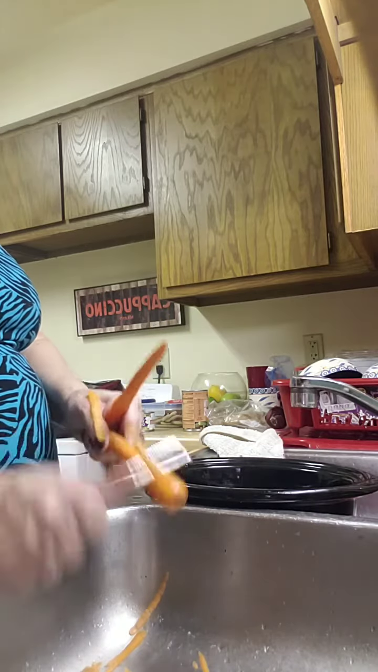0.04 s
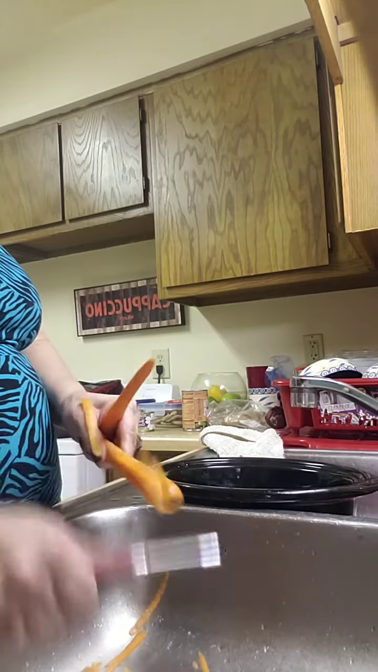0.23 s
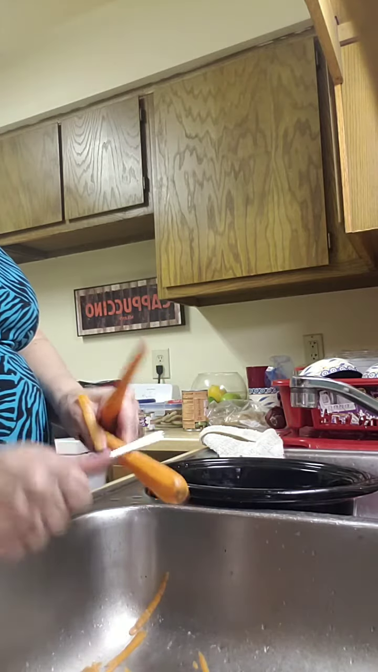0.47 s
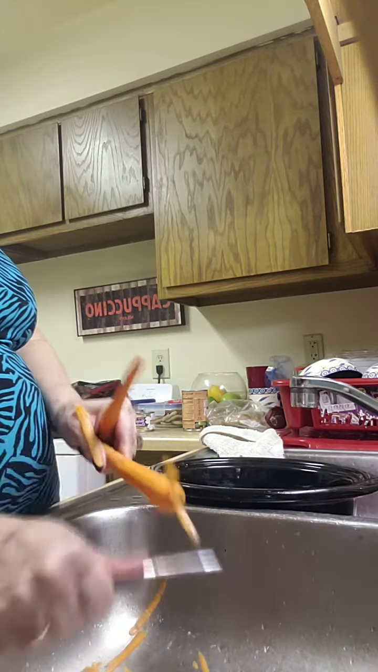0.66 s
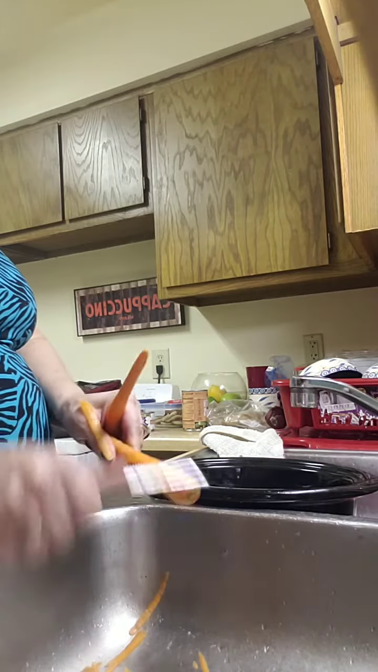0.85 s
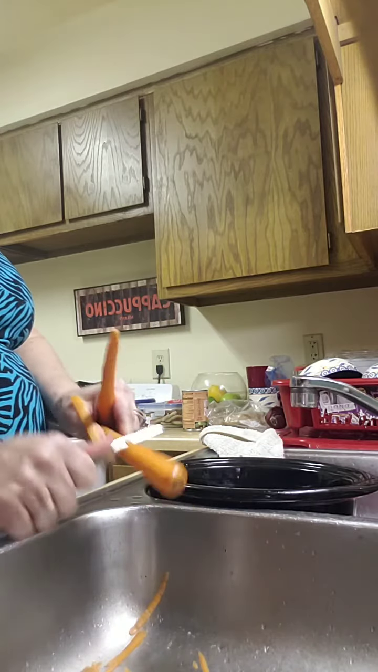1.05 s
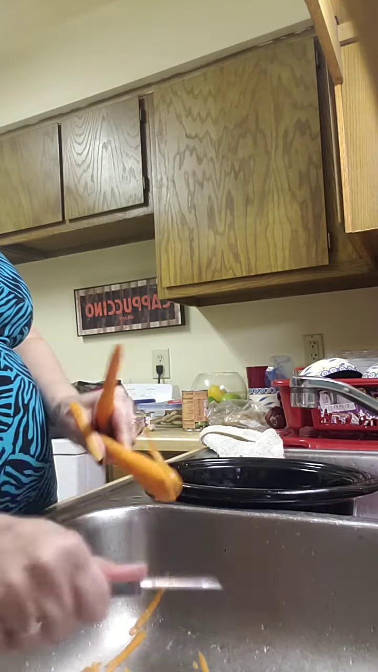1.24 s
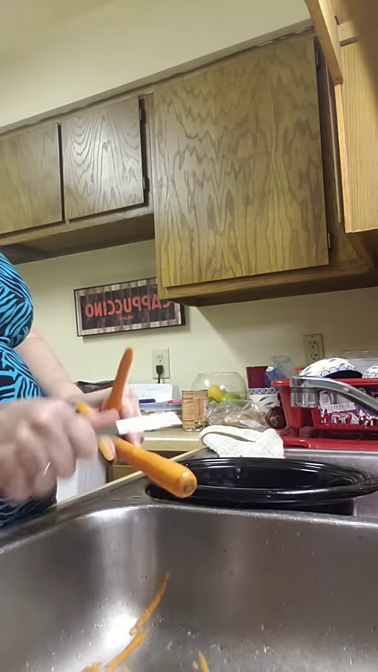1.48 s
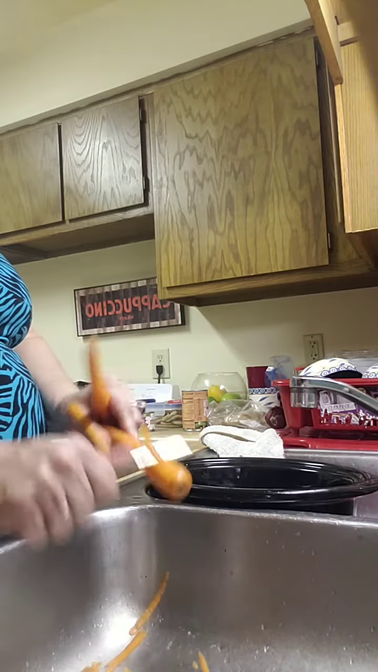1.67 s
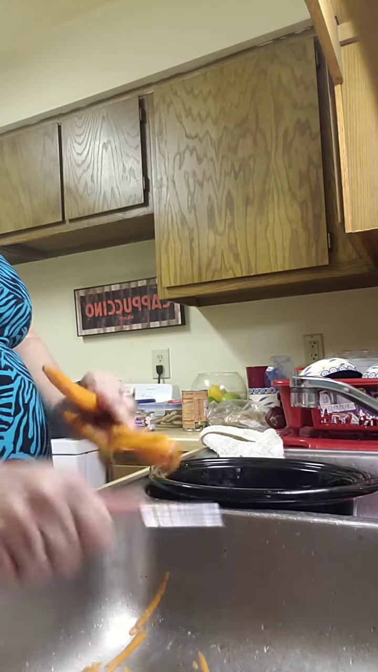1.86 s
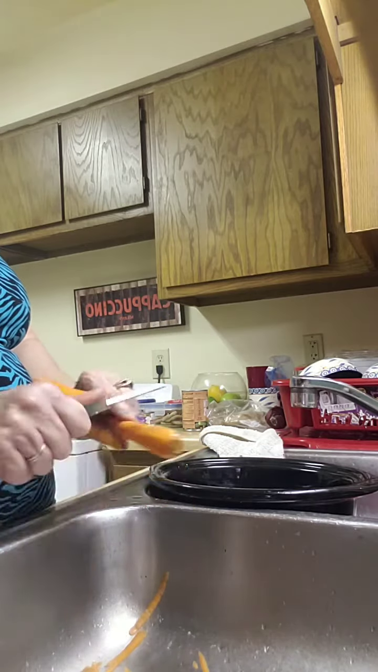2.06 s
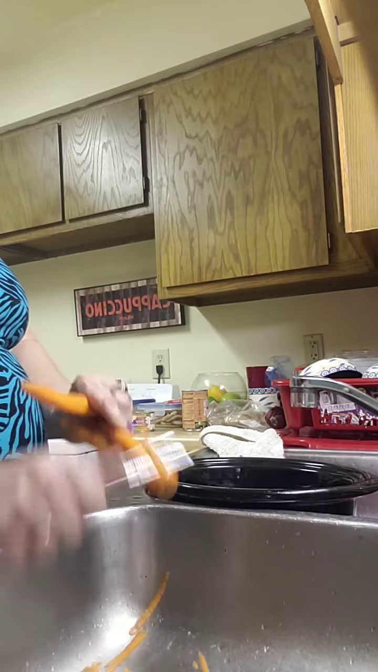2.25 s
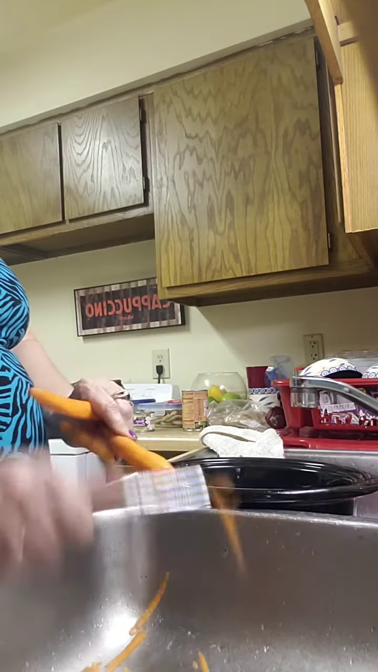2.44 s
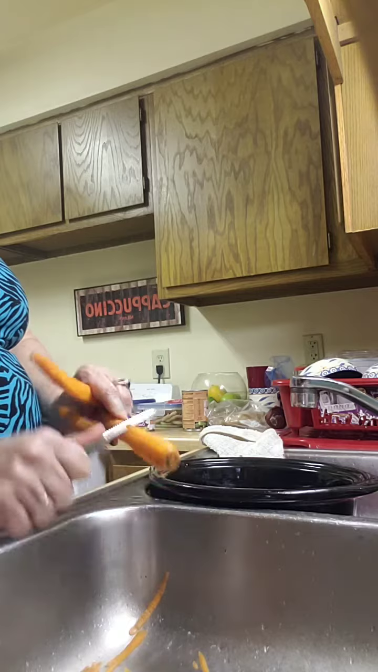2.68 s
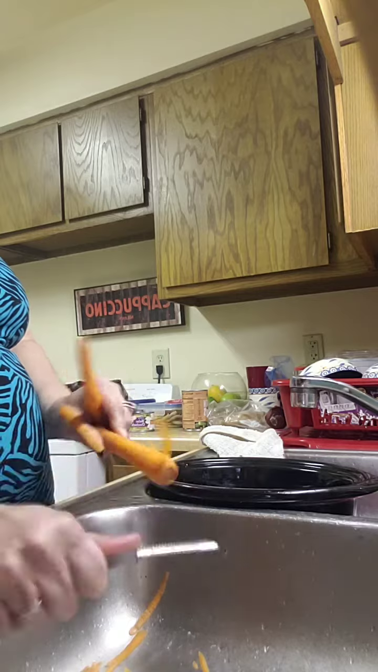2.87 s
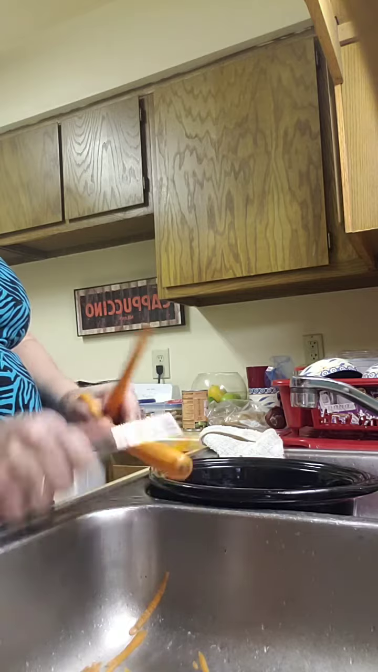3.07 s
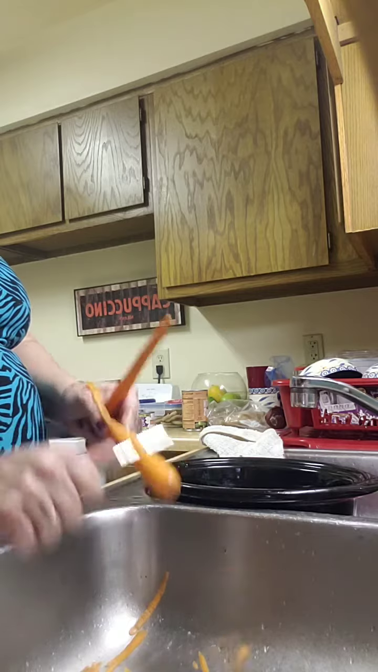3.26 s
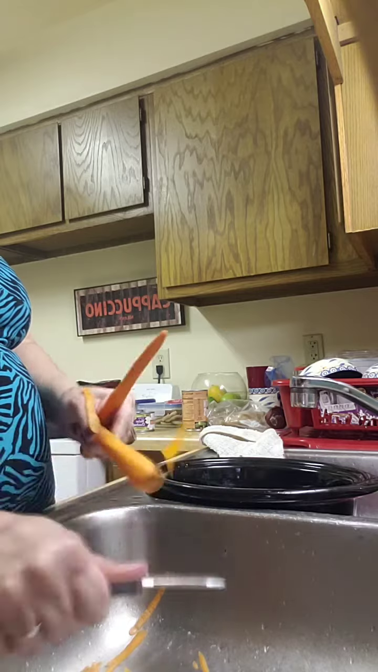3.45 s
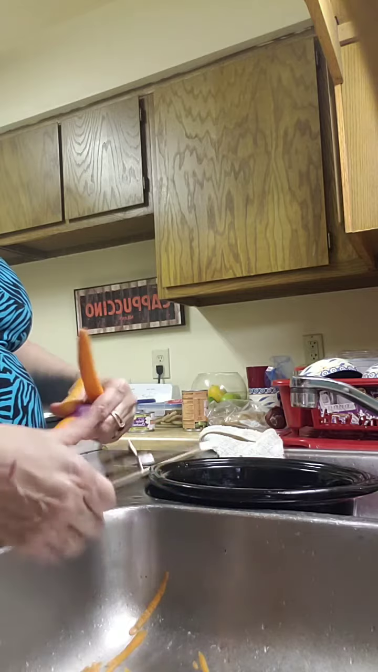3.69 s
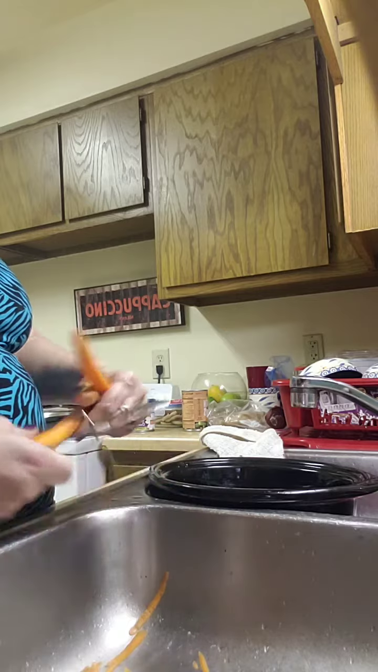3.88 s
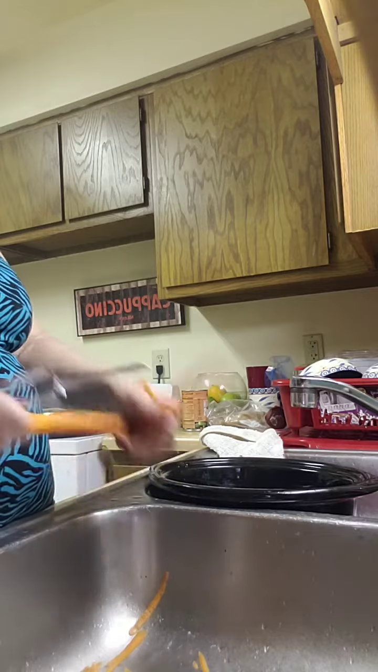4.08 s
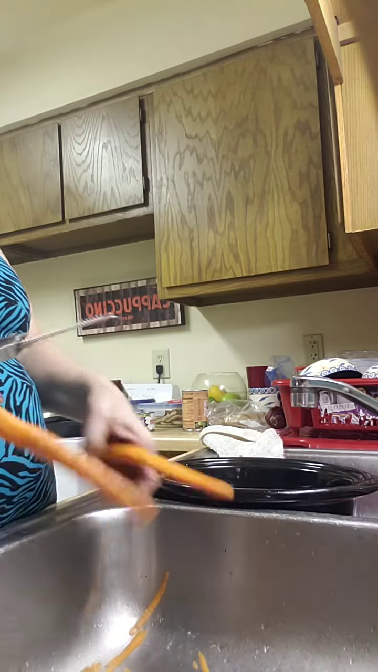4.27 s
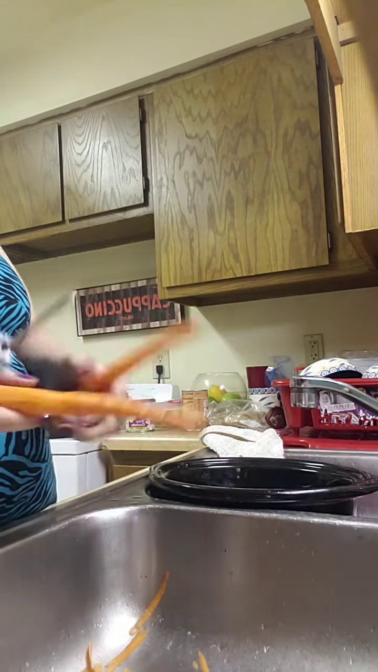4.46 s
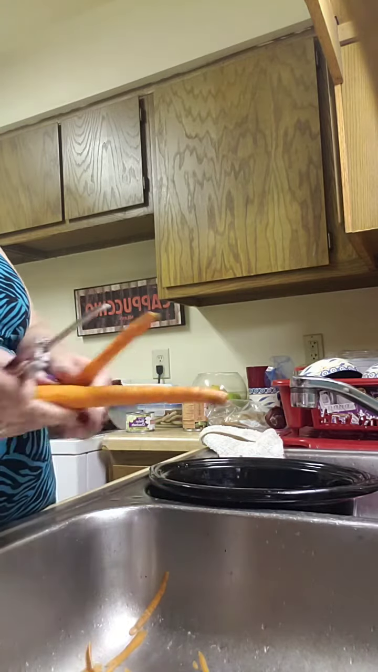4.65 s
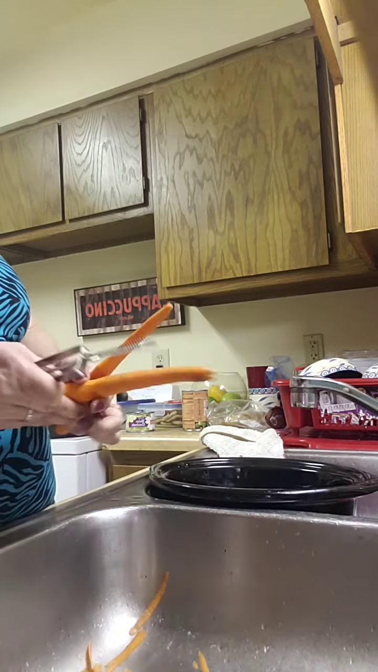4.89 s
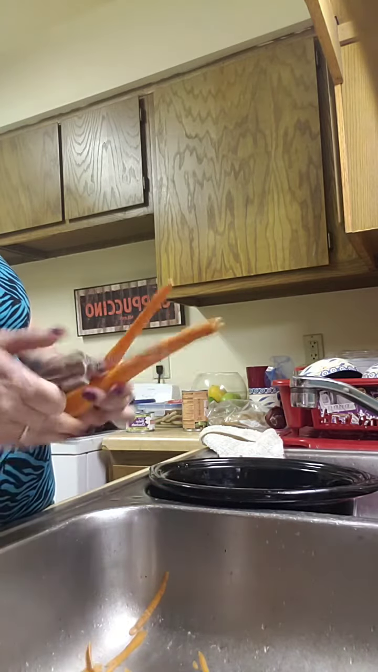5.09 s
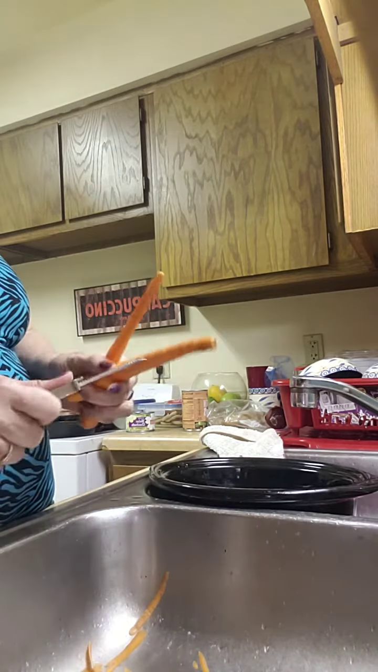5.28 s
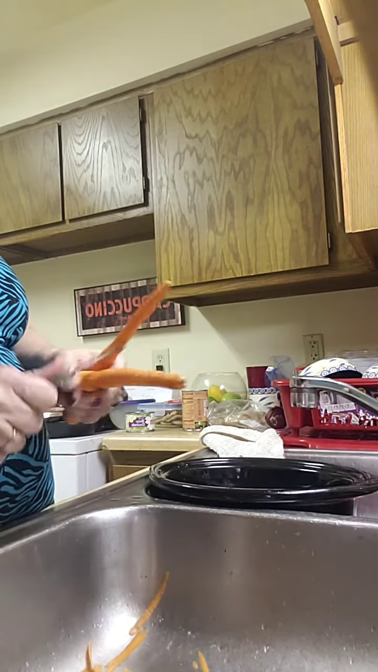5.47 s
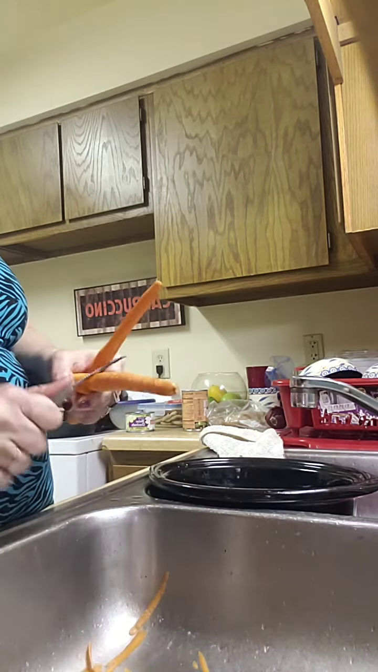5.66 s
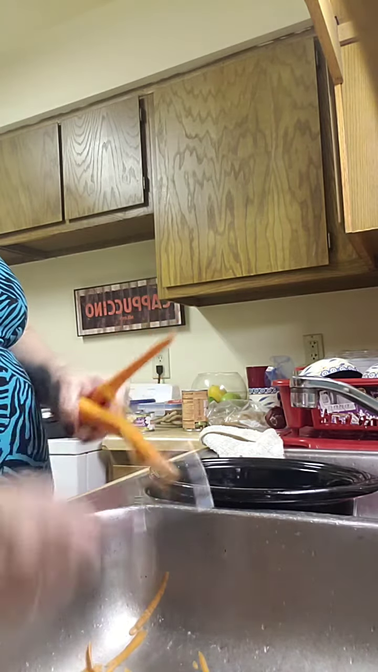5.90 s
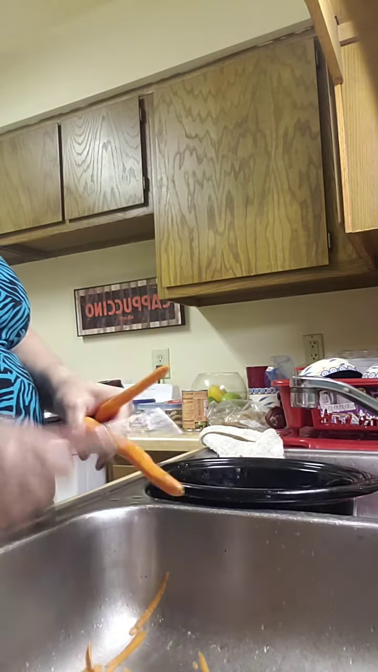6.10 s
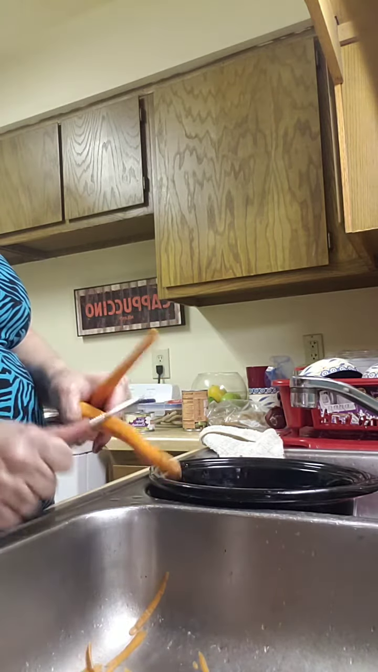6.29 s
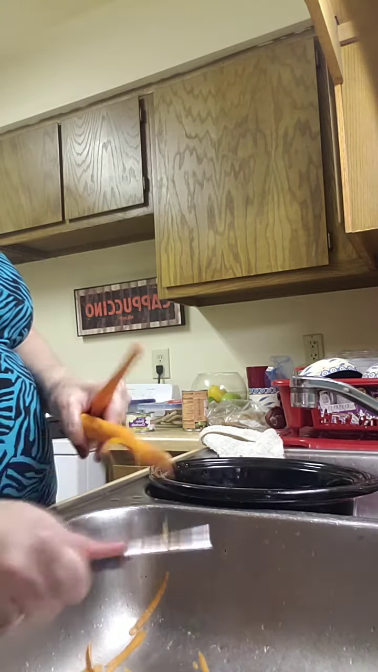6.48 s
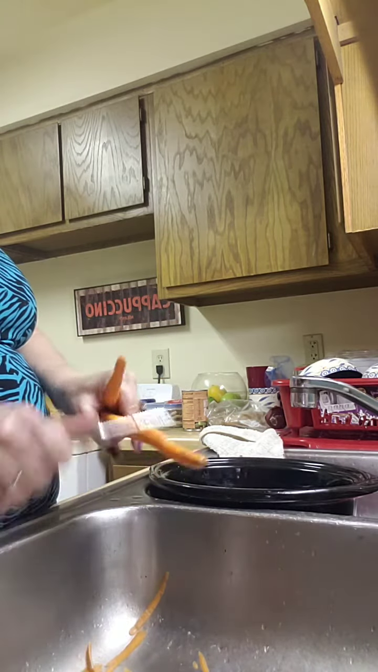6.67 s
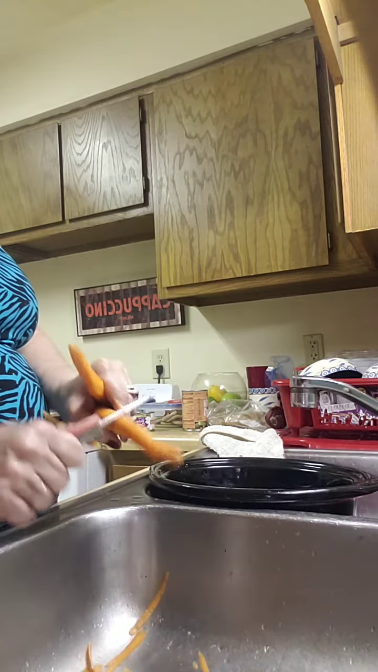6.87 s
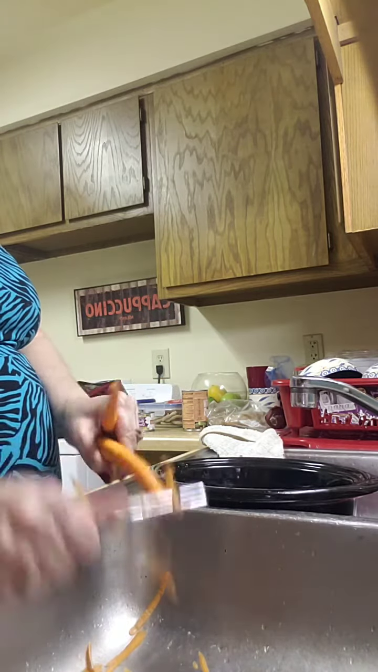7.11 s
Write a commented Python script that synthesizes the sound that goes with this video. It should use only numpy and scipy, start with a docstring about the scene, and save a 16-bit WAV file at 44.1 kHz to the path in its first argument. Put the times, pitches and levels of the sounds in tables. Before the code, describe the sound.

Carrots being peeled over a metal basin: short crisp scrapes, loose-blade rattles, a few wet plinks and knocks, quiet low hum behind.

```python
"""Raw carrots are scraped with a steel hand peeler over a steel sink in a small kitchen, 7.14 s.
From the start a refrigerator hums (wavering sines over shaped noise) and the edge hisses along
the carrot in strokes (spiky shaped noise). Then carrots knock in the hand (decaying tones, noise),
the loose blade clicks (chattering noise, steel modes; faint hiss trails two groups) and peels drop
into the basin (struck plate modes, slap noise). The work excites a short room tail."""
import sys
import numpy as np
from scipy import signal
from scipy.fft import rfft, irfft
from scipy.io import wavfile
from scipy.ndimage import uniform_filter1d

SR = 44100
rng = np.random.default_rng(int(sys.argv[2]) if len(sys.argv) > 2 else 0)


def transcribe(u):
    """Save the signal u as a 16-bit wav file named by the first command-line argument.

    u: samples, shape (n,) or (channels, n), limited to [-1, 1]; the rate is SR.
    q: integer samples, one column per channel.
    """
    v = np.clip(np.atleast_2d(u).T, -1, 1)
    q = np.round(v * 32767).astype(np.int16)
    wavfile.write(sys.argv[1], SR, q)


N = 314874

# refrigerator tones: pitch_hz; mean rms level_db
HUM_PITCH_HZ = [59.15, 118.4, 217.9, 240, 405.5, 437, 478]
HUM_LEVEL_DB = [-56.5, -64.5, -53, -52, -67.5, -67.5, -61]
# room noise spectrum: freq_hz, density_db (per Hz)
ROOM_NOISE = [(30, -17), (45, -37), (75, -19), (110, -6), (170, -11.5), (230, -2.5), (320, -13.5),
              (440, -7.5), (560, -13), (760, -17.5), (1150, -22.5), (1700, -25.5), (2600, -32),
              (13900, -38.5)]
ROOM_NOISE_DB = -54.5  # rms
# scrapes: peeling strokes; the faint rows at 3.615 and 5.28 are hiss trailing off after blade clicks
# start_s, build_s, pull_s, lift_s, land_db, full_db, end_db, bite_db (re level)
SCRAPES = [(0.0, 0.092, 0.015, 0.052, -39.5, -35.5, -35.5, -12.5),
           (0.49, 0.094, 0.076, 0.011, -45, -36.5, -41.5, -13.5),
           (1.035, 0.093, 0.089, .022, -51, -36, -42.5, -16),
           (1.595, 0.047, 0.13, 0.013, -50, -38, -37.5, -16.5),
           (2.17, 0.065, 0.085, .014, -62, -37, -36, -14.5),
           (2.69, 0.063, 0.082, 0.031, -48, -35.5, -36.5, -15.5),
           (3.23, .064, 0.079, 0.018, -45.5, -31.5, -34.5, -17.5),
           (3.615, .005, 0.14, .02, -55, -59, -71, -20), (5.28, .005, .046, .03, -50, -54, -59, -26),
           (5.675, 0.027, 0.073, .02, -47, -45, -44.5, -10.5),
           (5.775, 0.022, 0.11, .034, -48, -36, -39.5, -14),
           (6.275, 0.042, .006, .03, -47, -42.5, -41.5, -11.5),
           (6.337, .035, 0.082, .047, -42, -33.5, -42.5, -19),
           (6.904, 0.043, 0.056, 0.035, -46.5, -35.5, -37, -17),
           (7.012, 0.045, 0.038, 0.064, -43, -37.5, -41.5, -20.5)]
# scrape hiss spectrum: freq_hz, density_db (per Hz)
SCRAPE_SPECTRUM = [(1470, -54), (2500, -53), (3190, -22.5), (3870, -15), (4770, -10.5), (5350, -7),
                   (6310, 0), (8290, -11), (9370, -3.5), (10400, -5), (11000, -2), (12200, 2.5),
                   (13900, -6.5)]
# low part of the scrape, spectrum: freq_hz, density_db (per Hz)
BITE_SPECTRUM = [(530, -9), (900, -12), (1520, -11), (1680, -1), (1830, -6.5), (2150, -5), (2960, -3),
                 (3600, -9.5), (4680, 1), (7920, -120)]
# peeler blade modes: freq_hz, level_db, t60_s
BLADE_MODES = [(4200, 23.5, 0.047), (4600, 16, 0.076), (5400, 35.5, 0.0063), (6030, 25.5, 0.0076),
               (6690, -51, 0.023), (7100, -27, .03), (7730, -11, 0.076), (9500, -8.5, 0.085),
               (9800, 14, 0.016), (10100, -13, 0.027), (11280, 27, 0.067), (12100, -23, 0.026),
               (12140, -39, .03), (13400, 20, 0.033), (14300, 2, .03)]
# hands shifting on wet carrots: time_s, level_db
RUSTLE = [(0, -70), (.3, -74), (.72, -76), (.946, -73), (1.4, -71.5), (1.98, -68.5), (2.55, -73),
          (2.97, -67), (3.2, -79), (3.5, -70), (3.81, -85), (4.014, -65.5), (4.47, -66), (4.67, -63),
          (4.86, -71), (5.08, -68), (5.49, -63), (5.65, -73), (6.0, -88), (6.186, -61.5), (6.6, -74),
          (6.85, -66), (7.14, -59)]
# carrots knocking together: start_s, level_db, pitch_hz, t60_s, snap_db (re level), thud_db (re level)
KNOCKS = [(0.174, -41, 1282, 0.11, -18, -12), (4.3504, -29, 1197, 0.05, -12.5, -8),
          (4.3635, -37, 1180, 0.16, -3.5, -21), (5.0392, -35, 1607, 0.33, -14, -22)]
# blade clicks: start_s, level_db, treble_db (relative), frame_hz, frame_db (relative), blade_hz, rattle_ms
CLICKS = [(0.303, -44, -24, 3240, -13, 4940, 9.3), (0.398, -39.5, -13, 2300, -18, 4300, 11),
          (0.4747, -29.5, -6, 2070, -10, 4520, 12.5), (0.652, -29, -12, 2030, -16, 4370, 5.1),
          (0.7502, -42, -3, 1970, -14, 7000, 11.5), (0.979, -50.5, 5.5, 2400, -1, 6460, 17),
          (1.0154, -19, -6, 1990, -22, 6450, 6.1), (1.2027, -23, -3, 2050, -16.5, 4600, 11),
          (1.3242, -53, -13, 1950, 1.5, 4610, 13), (1.492, -47.5, 2, 2180, -14, 6500, 11),
          (1.5814, -30.5, -6.5, 1940, -15.5, 4840, 8.1), (1.766, -25, -22, 3230, -15, 5060, 3.6),
          (1.8674, -51, -16, 2830, 0.5, 6380, 10), (1.925, -47, -15, 2650, -6, 6400, 11.5),
          (1.9646, -50, -9.5, 2870, 1, 4620, 9.2), (2.0204, -44, -9, 2750, -6, 4560, 7.8),
          (2.0832, -44.5, -5, 2960, -6.5, 6290, 14), (2.148, -35.5, -7, 1960, -9, 5000, 7.9),
          (2.315, -24, -24, 2000, -20, 4800, 8.3), (2.841, -23.5, -2, 1980, -19, 6200, 11.6),
          (3.209, -14, -0.5, 2180, -32, 6260, 7.7), (3.3722, -22.5, -23, 3080, -22, 5220, 8.1),
          (3.5255, -32, -10, 2270, -12.5, 6040, 9), (3.5375, -33.5, 6, 2150, -24, 6800, 11),
          (3.5542, -19.5, -2.5, 2820, -15, 6300, 14), (3.576, -30.5, 8.5, 2640, -10, 6200, 11.5),
          (3.598, -16.5, -0.5, 2710, -21, 5360, 11.7), (3.7648, -35.5, -5.5, 2630, -5.5, 5400, 17),
          (4.216, -44.5, -6, 1820, -19, 6500, 7.9), (4.3196, -47.5, 9.5, 2300, -16, 6340, 10),
          (5.1365, -24.5, 1.5, 2760, -18, 6700, 6.6), (5.1943, -26, -16, 2850, -28, 5700, 9.5),
          (5.235, -21, -2, 2610, -13, 6000, 15), (5.255, -27, -4, 2610, -15, 6630, 2.6),
          (5.2694, -34.5, 4.5, 2420, -24, 6400, 12), (5.3887, -28, -6, 2690, -8.5, 6400, 6.4),
          (5.4195, -49.5, 14, 2480, -0.5, 6360, 12), (5.5562, -33, -6.5, 2660, -20, 4300, 5.7),
          (5.655, -14, -2.5, 2190, -22, 6220, 9.7), (6.111, -42, 0, 3020, -14, 6140, 12),
          (6.167, -29.5, -2, 2500, -8.5, 6540, 17), (6.2646, -36, 1, 2000, -3, 6300, 13.6),
          (6.2995, -31.5, -25, 1940, -22, 5570, 13), (6.348, -29.5, -5, 2820, -19, 5660, 19),
          (6.7971, -39, 1, 2030, -5, 6450, 24), (6.8284, -35, 2, 3000, -12, 4100, 14),
          (6.904, -38, 2, 2700, -23, 6600, 11)]
# peels and tips landing: start_s, level_db, slap_db, deep_db, boom_db (last three re level)
DROPS = [(0.406, -44.5, -17, 3, -16), (0.8754, -35, -5.5, 8, -3), (0.9038, -52, -24, 17.5, -16),
         (2.0844, -46, -25, 3, -18), (2.5888, -17, -2.5, -5, -48), (3.262, -34, -24, 11, 4),
         (3.7677, -44.5, -4, 7.5, 10.5), (6.1584, -43.5, -3, -15, -21)]
# basin plate modes: freq_hz, level_db, t60_s
BASIN_MODES = [(410, -7, .25), (475, -5, .25), (570, -3, .15), (639, -1, .15), (680, -4, .08),
               (833, -4, .22), (983, -6, .22), (1039, 0, .22), (1214, 1, .21), (1327, -2, .22),
               (1354, -4, .22), (1500, -5, .25), (1554, -2, .2), (1704, -7, .25), (1960, -5, .18),
               (2238, -3, .18), (2380, -6, .15), (2813, 0, .1), (2874, -2, .1), (3063, -3, .13),
               (3240, -5, .13), (3420, -5, .13)]
# slap and snap spectrum: freq_hz, density_db (per Hz)
SLAP_SPECTRUM = [(1470, -5.5), (2500, -0.5), (2800, 0), (3630, -5.5), (5870, -2), (8780, -17.5),
                 (11100, -19), (13900, -30)]
# crowd of small plate modes, spectrum: freq_hz, density_db (per Hz)
CLATTER_SPECTRUM = [(290, -95), (500, -11), (770, -0.5), (814, -41), (1010, 4), (1840, -27), (2020, -6),
                    (4500, -15.5), (5850, -52), (9900, -120)]
# room decay: freq_hz, t60_s
ROOM_DECAY = [(300, 0.38), (1000, 0.41), (3000, 0.35), (7000, 0.27), (13000, 0.25)]

LIFT_DB, TRAIL_S, TRAIL_DB = -34, 0.069, -5  # steep fall at the end, then a faint trailing rub
SOFT_BITE_DB_PER_DB = 0.37  # the lighter the touch, the more the low part stands out
CLICK_RISE_S, BLADE_RING_DB = 0.001, -6.5
ROOM_TAIL_DB, EDGE_HZ = -7.5, 13950


def gain_of(db):
    """Decibels to amplitude."""
    return 10 ** (np.asarray(db) / 20)


def evened(x):
    """Scales to an rms of one."""
    return x / np.sqrt(np.mean(x ** 2) + 1e-20)


def read(points, hz):
    """Interpolates a table on a log-frequency axis."""
    table_hz, value = np.transpose(points)
    return np.interp(np.log(hz + 1), np.log(table_hz + 1), value)


def add(mix, start_s, sound):
    """Mixes a sound in at start_s, cut at the end of the mix."""
    part = mix[round(start_s * SR):][:len(sound)]
    part += sound[:len(part)]


def filtered(x, spectrum):
    """Applies a dB spectrum."""
    hz = np.fft.rfftfreq(len(x), 1 / SR)
    return irfft(rfft(x) * gain_of(read(spectrum, hz)), len(x))


def coloured(x, spectrum):
    """Applies a dB spectrum and evens the level."""
    return evened(filtered(x, spectrum))


def noise(count):
    """White noise of rms about one."""
    return rng.standard_normal(count)


def drift(top_hz, count):
    """Random wander below top_hz, rms one."""
    return evened(signal.sosfilt(signal.butter(2, top_hz, fs=SR, output="sos"), noise(count)))


def rise(t, tau_s):
    """Exponential onset from zero to one."""
    return 1 - np.exp(-t / tau_s)


def ring(modes, t, spread_db):
    """One blow on a set of modes, one row each; chance of spread_db sets how strongly each speaks."""
    hz, db, t60_s = np.transpose(modes)[:, :, None]
    luck = rng.standard_normal((len(hz), 1))
    return gain_of(db + spread_db * luck - 60 * t / t60_s) * np.sin(2 * np.pi * hz * t)


def refrigerator():
    """Motor tones that waver in phase and level, the higher ones more, over the noise of the room."""
    t, out = np.arange(N) / SR, np.zeros(N)
    for hz, db in zip(HUM_PITCH_HZ, HUM_LEVEL_DB):
        sway_rad = 0.39 * (hz / 240) ** 2 * drift(4.55, N)
        level = gain_of(db + 1.17 * hz / 240 * drift(2.0, N))
        phase_rad = 2 * np.pi * (hz * t + rng.random()) + sway_rad
        out += np.sqrt(2) * level * np.sin(phase_rad)
    return out + gain_of(ROOM_NOISE_DB) * coloured(noise(N), ROOM_NOISE)


def scrape_levels(start_s, build_s, pull_s, lift_s, land_db, full_db, end_db, bite_db):
    """Level of one row of SCRAPES and of its bite: build-up, pull, lift-off, trailing rub."""
    corners_s = np.cumsum([0, build_s, pull_s, lift_s, TRAIL_S])
    t = np.arange(0, corners_s[-1], 1 / SR)
    off_db = end_db + LIFT_DB
    level_db = np.interp(t, corners_s, [land_db, full_db, end_db, off_db, off_db + TRAIL_DB])
    # 7 ms fades; a row at time zero has no fade-in
    edges = np.clip(np.minimum(t + (start_s == 0), corners_s[-1] - t) / .007, 0, 1)
    bite = gain_of(level_db + bite_db + SOFT_BITE_DB_PER_DB * (full_db - level_db))
    return edges * gain_of(level_db), edges * bite


def tearing():
    """Countless fibres tear under the edge: noise with exponentially spread dB peaks and moving colour."""
    tears = gain_of(1.35 * rng.exponential(1, N)) * noise(N)
    tears *= gain_of(1.0 * drift(55, N) + 1.13 * drift(450, N))  # the blade grips and slips on the skin
    z = signal.stft(tears, nperseg=512)[2]
    patches = uniform_filter1d(rng.standard_normal(z.shape), size=7, axis=0)
    patches = uniform_filter1d(patches, size=5, axis=1)
    # the colour shifts with grip and angle
    return signal.istft(z * gain_of(2.6 * evened(patches)), nperseg=512)[1][:N]


def scraping():
    """Tearing fibres hiss and shake the blade's modes, levels set by SCRAPES; the hands rustle."""
    tears = tearing()
    blade = signal.oaconvolve(tears, ring(BLADE_MODES, np.arange(3000) / SR, 0).sum(0))[:N]
    hiss = evened(coloured(tears, SCRAPE_SPECTRUM) + 0.12 * evened(blade))
    rustle = coloured(noise(N), SCRAPE_SPECTRUM) * gain_of(2.0 * drift(19, N))
    level, bite = np.zeros((2, N))
    for row in SCRAPES:
        row_level, row_bite = scrape_levels(*row)
        add(level, row[0], row_level)
        add(bite, row[0], row_bite)
    hands = gain_of(np.interp(np.arange(N) / SR, *np.transpose(RUSTLE)))
    return level * hiss + bite * coloured(tears, BITE_SPECTRUM) + hands * rustle


def knocks():
    """A short woody tone, kept rough by the rub that follows, with a dry snap and a thud."""
    out, t = np.zeros(N), np.arange(9000) / SR
    for start_s, level_db, hz, t60_s, snap_db, thud_db in KNOCKS:
        wood_modes = [(hz, 0, .05), (1.1 * hz, 0, .03), (1.3 * hz, -1, .012), (2.2 * hz, -8, .012)]
        wood = ring(wood_modes, t, 0).sum(0)
        rub = noise(len(t)) * gain_of(-60 * t / t60_s) * rise(t, 0.00067)
        tone = signal.fftconvolve(wood, rub)[:len(t)]
        tone += 17.0 * ring([(hz, 0, t60_s)], t, 0)[0] * rise(t, 0.00057)
        snap = coloured(noise(len(t)), SLAP_SPECTRUM) * gain_of(snap_db - 60 * t / 0.092)
        thud = np.sin(2 * np.pi * 165 * t) * gain_of(thud_db - 60 * t / 0.07)
        add(out, start_s, gain_of(level_db) * (0.022 * tone + .5 * snap + thud))
    return out


def clicks():
    """A sharp snap, then the loose blade chatters in its slot for a few ms, ringing blade and frame."""
    out, t = np.zeros(N), np.arange(4096) / SR
    for start_s, level_db, treble_db, frame_hz, frame_db, blade_hz, rattle_ms in CLICKS:
        force = np.clip((level_db + 61.0) / 30, .15, 1)  # light touches hardly rattle or ring
        chatter = np.exp(-(t * 1000 / rattle_ms) ** 1.74) + 0.14 * np.exp(-t / 0.024)
        rattle = 1.4 * np.exp(-t / 0.00062) + force * chatter
        rattle *= rise(t, CLICK_RISE_S)
        rattle *= gain_of(2.0 * drift(330, len(t)))  # separate bounces within the chatter

        knocking = noise(len(t))
        blade = signal.fftconvolve(knocking, ring(BLADE_MODES, t[:2048], 4).sum(0), "same")
        steel = coloured(knocking, SCRAPE_SPECTRUM) + 0.21 * evened(blade)
        steel = filtered(steel, [(7500, 0), (8800, treble_db)])
        steel += 0.077 * gain_of(frame_db) * coloured(knocking, BITE_SPECTRUM)

        tones = [(frame_hz, 0, .022 * force), (1.5 * frame_hz, 0, .018 * force),
                 (blade_hz, 0, .014 * force)]
        rings = signal.fftconvolve((knocking * rattle)[None], ring(tones, t, 0), axes=1)[:, :len(t)]
        rings /= abs(rings).max(axis=1, keepdims=True)
        rings = gain_of([frame_db + 2.5, frame_db - 9, BLADE_RING_DB]) @ rings
        add(out, start_s, gain_of(level_db) * (0.5 * rattle * steel + 0.58 * rings))
    no_bass = signal.butter(2, 1600, "high", fs=SR, output="sos")  # too small to move bass
    return signal.sosfilt(no_bass, out)


def drops():
    """A wet slap, the basin's plate modes with a rough clatter between them, and a low boom of the bowl."""
    out, t, hz = np.zeros(N), np.arange(16000) / SR, np.transpose(BASIN_MODES)[0]
    no_bass = signal.butter(3, 400, "high", fs=SR, output="sos")  # thin plate radiates little bass
    for start_s, level_db, slap_db, deep_db, boom_db in DROPS:
        contact = 0.052 * noise(900) * np.exp(-t[:900] / 0.0029)
        contact[0] = 1  # one blow, then the wet peel settling
        share_db = deep_db * (hz < 750) + slap_db * (hz > 1800)  # a soft landing leaves high modes quiet
        modes = gain_of(share_db)[:, None] * ring(BASIN_MODES, t, 0.4)
        basin = signal.fftconvolve(modes.sum(0), contact / np.linalg.norm(contact))[:len(t)]

        clatter = coloured(noise(len(t)), CLATTER_SPECTRUM) * gain_of(-60 * t / 0.16)
        deep = coloured(noise(len(t)), [(330, -56), (450, 0), (850, -11), (1200, -28)])
        clatter += 0.4 * deep * gain_of(deep_db - 60 * t / 0.28)
        slap = coloured(noise(len(t)), SLAP_SPECTRUM) * gain_of(slap_db - 60 * t / 0.15)
        boom = np.sin(2 * np.pi * 160 * t) * gain_of(boom_db - 60 * t / 0.055)

        plate = rise(t, 0.00046) * (0.2 * basin + 0.24 * clatter + 0.57 * slap)
        plate = signal.sosfilt(no_bass, plate)
        add(out, start_s, gain_of(level_db) * (plate + boom * rise(t, 0.0043)))
    return out


def kitchen(x):
    """Room tail: sparse taps of random sign, each band dying at its own speed."""
    taps = np.zeros(SR // 2)
    slots = np.arange(100, len(taps) - 20, 20)  # one tap somewhere in every 20 samples
    taps[slots + rng.integers(0, 20, len(slots))] = 1
    taps *= rng.choice([-1., 1.], len(taps))
    hz, t, z = signal.stft(taps, SR, nperseg=256)
    decay = gain_of(-60 * t / read(ROOM_DECAY, hz)[:, None])
    tail = signal.istft(z * decay, SR, nperseg=256)[1]
    return signal.fftconvolve(x, tail / np.linalg.norm(tail))[:N]


def scene():
    """The work at the sink with its room tail, and the hum."""
    work = scraping() + knocks() + clicks() + drops()
    return (work + gain_of(ROOM_TAIL_DB) * kitchen(work) + refrigerator())[None]


def record(dry):
    """Linear-phase low-pass at EDGE_HZ."""
    lowpass = signal.firwin(511, EDGE_HZ, window=("kaiser", 9), fs=SR)
    return signal.oaconvolve(dry, lowpass[None], "same")


dry = scene()
out = record(dry)
transcribe(out)
```